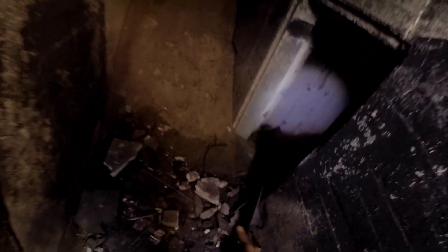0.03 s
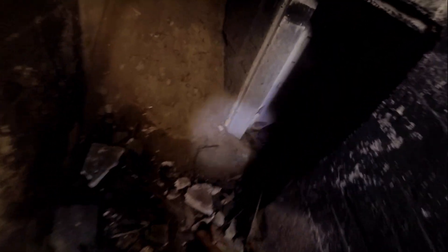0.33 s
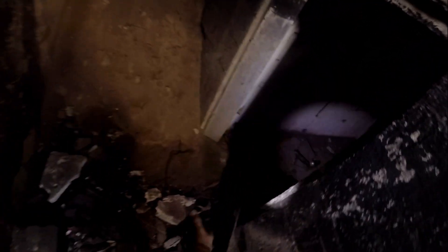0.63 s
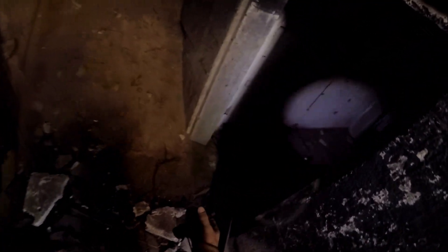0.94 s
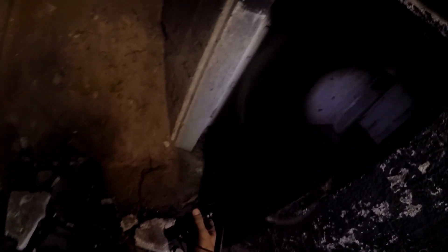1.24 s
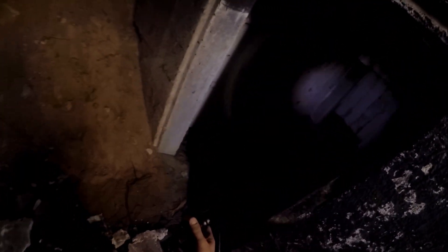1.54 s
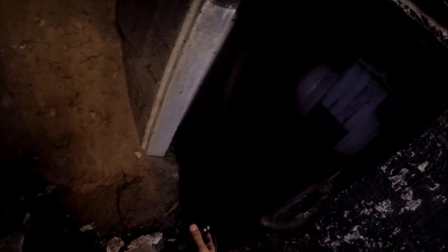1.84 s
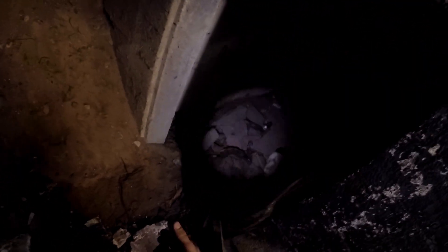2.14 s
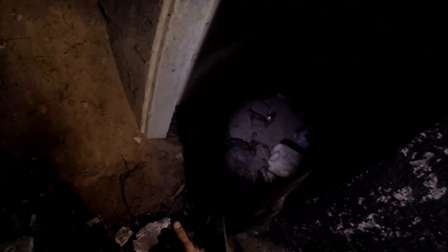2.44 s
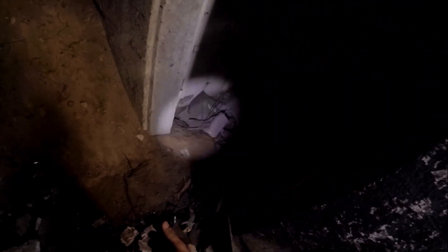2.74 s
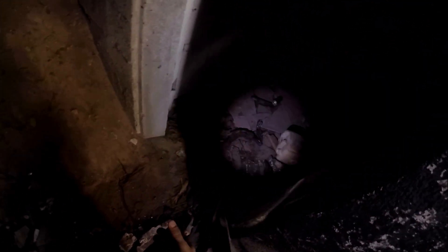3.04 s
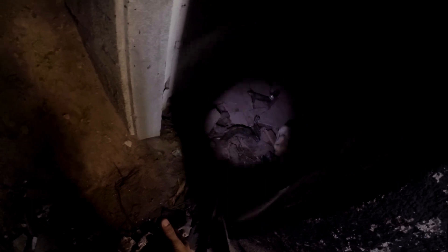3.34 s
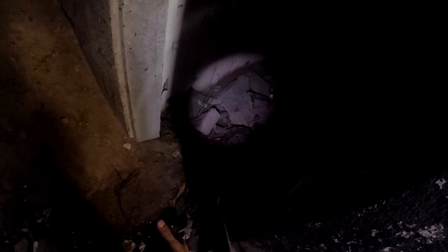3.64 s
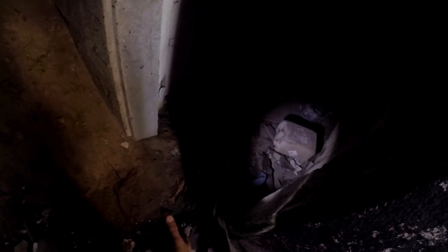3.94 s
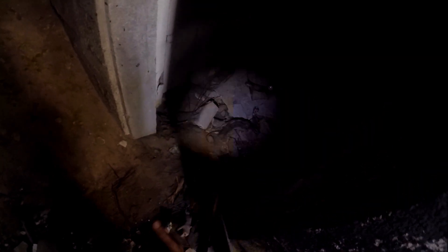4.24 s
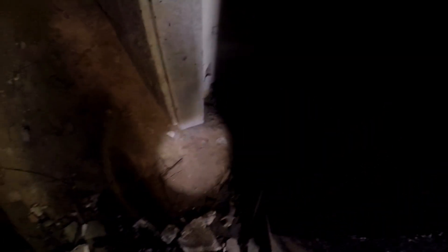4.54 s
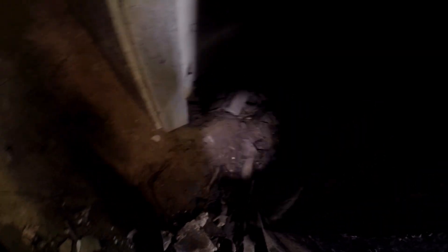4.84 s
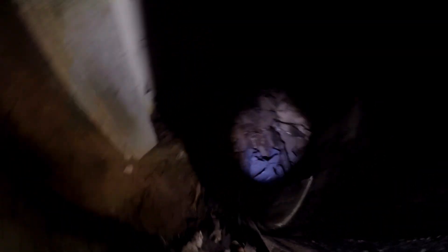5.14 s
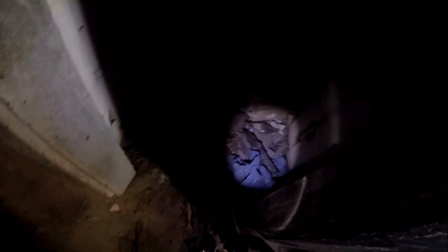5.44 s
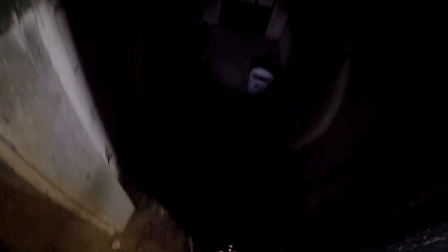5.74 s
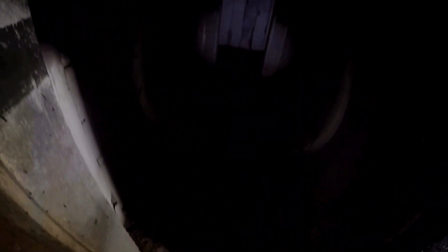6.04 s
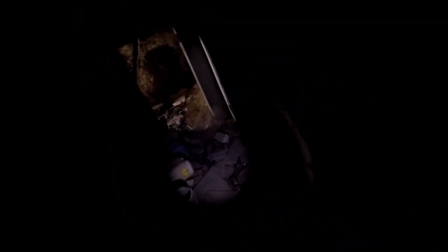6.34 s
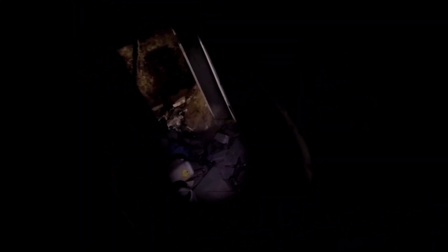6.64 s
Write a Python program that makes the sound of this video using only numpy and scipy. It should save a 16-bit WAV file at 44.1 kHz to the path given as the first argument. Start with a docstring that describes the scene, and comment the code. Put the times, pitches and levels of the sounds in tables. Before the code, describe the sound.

Close footsteps thud and grind on broken concrete over a low rumble and faint hiss. Early on, a slab tips with a sharp crack, followed by a small clink and scattered ticks of shifting pieces. A few heavier steps then scuff and crunch through the debris before it settles under a brief low throb. The hand-held stereo microphone picks up a short echo from the bare walls of an abandoned building.

```python
"""Doorway of a derelict building, hand-held stereo microphone, close to someone crossing concrete rubble.
From the start, grit trickles over low rumble and faint hiss; steps thud, grind and knock fragments
together, and bare walls add a short ring. At 1.3 s a slab cracks down hard; at 2.1 s a thin chip clinks.
Lighter knocks follow, small pieces tipping at random, until heavier steps land from 4.3 s.
After 6 s the grit settles and a deep throb swells up."""
import sys
import numpy as np
from scipy import signal
from scipy.fft import rfft, irfft, next_fast_len
from scipy.io import wavfile
from scipy.ndimage import uniform_filter1d

SR = 44100
rng = np.random.default_rng(int(sys.argv[2]) if len(sys.argv) > 2 else 0)


def to_wav(sig):
    """Store sig (one row per channel, or 1-D mono) as 16-bit WAV at the path in sys.argv[1].

    Samples outside -1..1 are clipped; the rate is SR.
    """
    pcm = np.clip(np.atleast_2d(sig), -1, 1) * 32767
    pcm = np.round(pcm).astype(np.int16)
    wavfile.write(sys.argv[1], SR, pcm.T)  # frames by channels


N = 298733
TIME = np.arange(N) / SR


def undb(db):
    """Decibels to gain."""
    return 10 ** (np.asarray(db) / 20)


def rms(x):
    """Root mean square."""
    return np.sqrt(np.mean(x ** 2))


def unit(x):
    """Scale to rms 1."""
    return x / rms(x)


def curve(rows):
    """Gain over time from rows of t/s, level/dB."""
    return undb(np.interp(TIME, *np.transpose(rows)))


def colour(x, points):
    """Causal filter through points of f/Hz, level/dB."""
    size = 2 * next_fast_len(len(x))
    hz, db = np.transpose(points)
    log_hz = np.log(np.fft.rfftfreq(size, 1 / SR) + 1)
    log_gain = np.log(undb(np.interp(log_hz, np.log(hz), db)))
    cepstrum = irfft(log_gain)[:size // 2]
    cepstrum[1:] *= 2  # minimum phase
    return irfft(rfft(x, size) * np.exp(rfft(cepstrum, size)))[:len(x)]


def band(x, lo_hz, hi_hz):
    """Band-pass."""
    return signal.sosfilt(signal.butter(3, [lo_hz, hi_hz], btype="band", fs=SR, output="sos"), x)


def resonate(x, hz, q):
    """One resonance, gain 1 at its centre."""
    return signal.lfilter(*signal.iirpeak(min(hz, SR / 3), q, fs=SR), x)


def ring(modes, t):
    """The free ringing of a struck piece: decaying sines."""
    return sum(undb(db) * np.sin(2 * np.pi * hz * t + rng.uniform(0, 2 * np.pi))
               * np.exp(-np.log(1000) * t / t60) for hz, db, t60 in modes)


def grains(count, per_s, dust, spread_db=1.8):
    """Random clicks of unequal size over a bed of fine dust."""
    clicks = (rng.random(count) < per_s / SR) * rng.standard_normal(count)
    size = undb(spread_db * np.minimum(rng.exponential(size=count), 4))
    return unit(unit(clicks * size) + dust * rng.standard_normal(count))


def add(out, s, x):
    """Mix x in at time s."""
    start = int(s * SR)
    x, start = x[max(-start, 0):], max(start, 0)
    out[start:start + len(x)] += x[:N - start]


# Rumble at the microphone: t/s, relative level/dB
RUMBLE_LEVELS = [(0.0, -37.5), (0.28, -36.5), (0.9, -44), (1.4, -39), (2.15, -47), (2.8, -44.5), (4.2, -43),
                 (5.6, -42.5), (6.2, -45), (6.77, -46.5)]
# Spectra of the rumble and of the microphone's hiss: f/Hz, relative level/dB
RUMBLE_SPECTRUM = [(4, -6.5), (15, 5), (26, -8.5), (39, -14.5), (56, -9.5), (80, -19.5), (120, -25.5),
                   (200, -41), (500, -44), (2000, -69)]
HISS_SPECTRUM = [(60, -0.5), (250, -1.5), (600, -7), (1600, -12), (4000, -13.5), (15000, -15.5)]


def rumble_and_hiss(rumble_db=1, side_db=-10, hiss_db=-57.5):
    """At the microphone: low rumble, mostly shared by both ports, and each port's own hiss."""
    mid, side = (unit(colour(rng.standard_normal(N), RUMBLE_SPECTRUM)) for _ in range(2))
    rumble = (mid + undb(side_db) * np.array([side, -side])) * curve(RUMBLE_LEVELS)
    hiss = np.array([unit(colour(rng.standard_normal(N), HISS_SPECTRUM)) for _ in range(2)])
    return rumble * undb(rumble_db) + hiss * undb(hiss_db)


# The closing swell in the bass: t/s, level/dB
THROB_LEVELS = [(6.1, -68), (6.35, -45.5), (6.5, -38), (6.66, -36), (6.72, -39), (6.77, -43)]


def throb(hz=31.8, upper_hz=57.0, upper_db=-11, waver=0.0566):
    """A deep, slightly wavering throb of two tones."""
    drift = unit(uniform_filter1d(rng.standard_normal(N), SR // 10))
    turn = 2 * np.pi * np.cumsum(1 + waver * drift) / SR
    return unit(np.sin(hz * turn) + undb(upper_db) * np.sin(upper_hz * turn)) * curve(THROB_LEVELS)


# Stereo width at the microphone: f/Hz, side against mid/dB
STEREO_WIDTH = [(50, -19), (200, -22), (700, -22), (1300, -56), (2400, -33), (4400, -13), (8000, -6),
                (15000, 1)]


def stereo_pair(x, scatter_s=0.0013, shifts_per_s=4.3):
    """Two close ports share the bass; the treble scatters differently to each as the source shifts."""
    t = np.arange(SR // 20) / SR
    paths = [unit(rng.standard_normal(len(t)) * np.exp(-t / scatter_s)) for _ in range(2)]
    one, other = (signal.fftconvolve(x, path / np.sqrt(len(t)))[:N] for path in paths)
    angle = 2 * np.pi * shifts_per_s * TIME
    side = colour(one * np.cos(angle) + other * np.sin(angle), STEREO_WIDTH)
    return np.array([x + side, x - side])


# Body, clack, bite and air bands of walls and rubble: lower f/Hz, upper f/Hz
BAND_EDGES = [(150, 700), (700, 2500), (2500, 7000), (7000, 15000)]


def walls(x, early_db=-8, early_s=0.015, late_db=-17, t60_low=0.34, t60_high=0.4):
    """Close reflections from ground and door frame, then the ring of the building farther off."""
    t = np.arange(SR) / SR
    early = rng.standard_normal(len(t)) * np.exp(-t / early_s) * (t > .003)
    t60s = np.linspace(t60_low, t60_high, len(BAND_EDGES))
    late = sum(band(rng.standard_normal(len(t)), *edges) * np.exp(-np.log(1000) * t / t60)
               for edges, t60 in zip(BAND_EDGES, t60s)) * (t > .012)
    response = (undb(early_db) * unit(early) + undb(late_db) * unit(late)) / np.sqrt(len(t))
    return x + signal.fftconvolve(x, response)[:N]


# Spectrum of the grit on the ground: f/Hz, relative level/dB
GRIT_SPECTRUM = [(60, -7), (250, 7), (600, 1), (1400, 0), (3000, -5), (7000, -9), (9000, -10),
                 (11000, -16.5), (15000, -28.5)]
# Grit settling under the shifting weight: t/s, relative level/dB
GRIT_LEVELS = [(0.0, -53.5), (0.3, -59), (0.49, -51.5), (0.78, -58.5), (0.94, -58), (1.24, -59),
               (1.38, -47), (1.7, -59), (2.62, -56.5), (3.0, -63.5), (3.55, -66), (4.15, -61),
               (4.49, -52.5), (4.95, -54.5), (5.12, -47.5), (5.62, -48.5), (6.05, -67.5), (6.77, -76)]


def grit(dust_db=-3, crumb_db=-7, crumb_q=7):
    """Around the feet fine dust trickles and tiny crumbs rustle, each at its own pitch."""
    dust = grains(N, per_s=900, dust=1, spread_db=0.43)
    crumbs = sum(resonate(grains(N, per_s=50, dust=0, spread_db=1.2), hz, crumb_q)
                 for hz in np.geomspace(700, 9000, num=12))
    dust, crumbs = (unit(colour(x, GRIT_SPECTRUM)) for x in (dust, crumbs))
    return (undb(dust_db) * dust + undb(crumb_db) * crumbs) * curve(GRIT_LEVELS)


def tipping_pieces(count=24, over_grit_db=1, spread_db=3, lo_hz=900, hi_hz=5500):
    """Small fragments tip over at random, as strongly as the grit is stirred."""
    out, stirred = np.zeros(N), np.transpose(GRIT_LEVELS)
    for k, (when, strength, pitch) in enumerate(rng.random((count, 3))):
        s = (k + when) / count * TIME[-1]
        db = np.interp(s, *stirred) + over_grit_db + spread_db * (2 * strength - 1)
        hz = lo_hz * (hi_hz / lo_hz) ** pitch
        add(out, s, knock(db, bite_db=1, air_db=-6, hz=hz, ring_db=9))
    return out


# Weight landing below the microphone: t/s, level/dB, f/Hz, decay/s
FOOTFALLS = [(0.278, -34.5, 291, 0.024), (1.24, -34.5, 67, 0.035), (1.383, -42, 54.6, 0.031),
             (2.05, -40.5, 328, 0.0028), (2.074, -51, 87.6, 0.055), (4.351, -30, 62.3, 0.024),
             (4.405, -36, 64.6, 0.065), (5.003, -39, 118, 0.11), (5.115, -34, 88, 0.082),
             (5.139, -36.5, 255, 0.059)]


def thuds(attack_s=0.0024, q=1.93):
    """The heel's soft push booms briefly in the ground."""
    out, t = np.zeros(N), np.arange(SR // 2) / SR
    for s, db, hz, decay in FOOTFALLS:
        envelope = (1 - np.exp(-t / attack_s)) * np.exp(-t / decay)
        boom = resonate(resonate(rng.standard_normal(len(t)), hz, q), hz, q) * envelope
        add(out, s, undb(db) * unit(boom) * rms(envelope / envelope.max()))
    return out


# Spectrum of broken concrete at close range: f/Hz, relative level/dB
CONCRETE_SPECTRUM = [(100, -6), (260, 8), (800, 4.5), (1500, 1.5), (3000, -3.5), (6000, -5.5), (8500, -7.5),
                     (10500, -11), (15000, -17.5)]


def concrete(push, envelope, band_db):
    """Concrete's answer to a push: body, clack, bite and air each take their share of the energy."""
    x = colour(push, CONCRETE_SPECTRUM)
    return sum(undb(db) * unit(band(x, *edges)) for edges, db in zip(BAND_EDGES, band_db)) * rms(envelope)


# The sole grinding on grit, body and bite against the clack:
# peak t/s, fall/s, clack level/dB, body/dB, bite/dB, ring f/Hz
SOLE_SCUFFS = [(.312, 0.032, -52.5, 2, 0.5, 356), (0.389, 0.032, -43.5, -2.5, -1.5, 990),
               (.487, 0.019, -49, 6, -10, 335), (.563, 0.014, -47.5, 5, -10, 264),
               (1.229, 0.012, -35.5, -1.5, -2.5, 599), (1.248, 0.012, -26, -5, -1, 1290),
               (1.273, 0.006, -34, -1, 5, 564), (1.296, 0.018, -36.5, -1, -5, 400),
               (1.438, 0.013, -41, -17, -1, 1820), (1.5, 0.0096, -43.5, -12, -0.5, 1640),
               (1.546, 0.025, -46.5, -5, 1.5, 1520), (1.63, 0.089, -55.5, 3, -12, 1240),
               (1.93, 0.022, -62.5, -1, 6, 3000), (2.081, 0.028, -46.5, 4.5, 2, 250),
               (2.12, 0.011, -45, -15, 2.5, 1320), (2.265, 0.011, -54.5, 8, 1, 450),
               (2.466, 0.0075, -55.5, -15, 9, 9000), (2.629, 0.018, -52, -21, 1.5, 4800),
               (2.87, 0.076, -56.5, -3.5, 3.5, 8450), (2.964, 0.023, -50.5, -2, 9.5, 1970),
               (4.315, 0.033, -50.5, -5, 2.5, 1850), (4.364, 0.019, -43.5, 1, -2, 335),
               (4.455, 0.022, -54, -4, -4, 1600), (4.969, .012, -40.5, -2, 3.5, 2650),
               (4.984, 0.0094, -35, -8.5, -4, 1710), (5.035, 0.068, -43.5, -3.5, -1.5, 4900),
               (5.113, 0.0082, -25, -6, -1, 2220), (5.129, 0.012, -26.5, -7, -7, 666),
               (5.158, 0.035, -25.5, -6.5, -6.5, 806), (5.195, 0.023, -37, -1.5, 2, 565),
               (5.3, 0.052, -43, -10, -8, 1350), (5.487, 0.053, -43, -6, -7, 1310),
               (5.66, 0.033, -40, -6, -4.5, 783), (5.788, 0.02, -54.5, 10.5, 2, 850),
               (5.965, 0.021, -49.5, -1.5, 4.5, 2450)]


def scuffs(air_db=-11, patchy_db=2.5, rise_share=0.93, ring_db=8, ring_q=10, damped_below_hz=650):
    """Grit crushes harder as the foot bears down, then dies away; the piece underfoot colours it."""
    out, t = np.zeros(N), np.arange(-SR // 5, SR // 3) / SR
    for s, fall, db, body_db, bite_db, hz in SOLE_SCUFFS:
        age = t / fall
        envelope = np.exp(-np.where(age < 0, (age / rise_share) ** 2, age))
        # the grit gives way in fits and starts
        fits = unit(uniform_filter1d(rng.standard_normal(len(t)), SR // 300))
        push = unit(grains(len(t), per_s=3000, dust=0.79) * undb(patchy_db * fits)) * envelope
        q = ring_q * min(hz / damped_below_hz, 1)  # low-pitched pieces lie deep and are damped more
        push = push + undb(ring_db) * resonate(push, hz, q)
        band_db = db + np.array([body_db, 0, bite_db, bite_db + air_db])
        add(out, s + t[0], concrete(push, envelope, band_db))
    return out * 1.0


# A thin chip clinking underfoot: t/s, level/dB
CHIP_CLINKS = [(2.077, -31), (2.113, -42), (2.123, -36.5)]
# Its modes: f/Hz, relative level/dB, t60/s
CHIP_RESONANCES = [(4120, -4.5, 0.047), (4850, 1, 0.039), (5660, -13, 0.045), (6220, 0, 0.035),
                   (7150, -12, 0.035), (7740, -3, 0.035)]


def chip():
    """A thin, hard chip rings higher and cleaner than the lumps around it."""
    out, t = np.zeros(N), np.arange(SR // 5) / SR
    for s, db in CHIP_CLINKS:
        add(out, s, undb(db) * ring(CHIP_RESONANCES, t))
    return out


def knock(db, bite_db, air_db, hz, ring_db, body_db=-10, snap_db=-16, rise_s=.0005, decay_s=.0042):
    """A sharp contact and a brief chatter ring a fragment's main mode and a few weaker ones."""
    t = np.arange(SR // 10) / SR
    envelope = (1 - np.exp(-t / rise_s)) * np.exp(-t / decay_s)
    push = grains(len(t), per_s=5000, dust=0.52) * envelope
    push[int(rise_s * SR)] += 4.4  # rough faces crush for an instant, then bear fully with a tick
    weak_hz = np.geomspace(500, 7000, num=9) * rng.uniform(0.79, 1.28, size=9)
    weak_modes = sum(resonate(push, f, q=18) for f in weak_hz)
    push = push + undb(ring_db) * resonate(push, hz, q=5) + weak_modes
    clack = concrete(push, envelope, db + np.array([body_db, 0, bite_db, air_db]))
    # snapping crumbs reach the very top of the treble
    snap = unit(band(rng.standard_normal(len(t)), 11200, 20000)) * envelope
    return clack + snap * undb(db + air_db + snap_db)


# Fragments knocking close by, bite and air against the clack:
# t/s, relative clack level/dB, bite/dB, air/dB, ring f/Hz, ring gain/dB
FRAGMENT_KNOCKS = [(0.021, -37.5, -21, -32, 1600, 15), (0.281, -42, -11, -7.5, 795, 15),
                   (0.39, -42, 4, -3, 1220, 8), (0.565, -51.5, 6.5, -1, 624, -1),
                   (0.912, -33.5, -18.5, -21, 1080, 31), (0.969, -34, -8, -30, 780, 4.6),
                   (1.19, -43, -3, -13, 1000, 12), (1.244, -22, 2.5, -25, 2180, 17),
                   (1.269, -28, 10.5, 0, 3800, 8.9), (1.413, -47, 3, 2, 3110, 7),
                   (1.533, -38, -17, -3.5, 1580, 19), (1.614, -44, -0.5, -15, 600, 10),
                   (1.626, -54.5, 11, 8, 870, 20), (1.905, -53.5, 8, 3, 3040, 4),
                   (1.986, -64, 14, 22.5, 7900, 2.3333), (2.074, -38, 7.5, 9.5, 6300, 19),
                   (2.26, -45.5, -9, -3, 930, 8), (2.312, -37, -2.5, -9, 990, 4.8),
                   (2.458, -57.5, 9, 18, 9100, 4), (2.621, -35.5, -7, -29, 2280, 9.8),
                   (2.879, -42.5, 6, 8.5, 5600, 24), (2.942, -49, 18, 8, 3880, 15),
                   (2.962, -40.5, 8, -3, 4560, 13), (3.076, -34.5, -5.5, -8.5, 1950, 11),
                   (3.216, -53.5, 2.5, 0, 1700, 8), (3.692, -45.5, 11, 2.5, 4430, 5),
                   (4.052, -54.5, 2, 6.5, 5620, 18), (4.13, -46.5, -21, -13, 1040, 24),
                   (4.25, -49, 6, 2, 6520, 2.6667), (4.28, -41.5, 4.5, 4.5, 659, 13),
                   (4.35, -31.5, -6, -20, 1500, 2.3), (4.387, -47.5, 6, 5.5, 3490, 9),
                   (4.411, -42.5, 2.5, -9, 3160, 10), (4.531, -53.5, 7.5, -8, 2470, 3),
                   (4.686, -45, -2, -22, 2070, 22), (4.924, -51, 11, 2.5, 5740, 6.4),
                   (4.964, -28.5, -3.5, -9.5, 1650, 10), (5.017, -36.5, 6.5, -10, 4840, 13),
                   (5.108, -29.5, 10.5, -18, 2080, 2.6667), (5.371, -38, -8, -13, 1270, 3),
                   (5.47, -49, -3, 2, 1230, 10), (5.645, -32.5, -0.5, -8, 760, 21),
                   (5.668, -42, -12, -19, 800, 19), (5.774, -35, -12, -30, 990, 18)]


def knocks(gain_db=2):
    """The larger fragments clack together under the feet."""
    out = np.zeros(N)
    for s, *fragment in FRAGMENT_KNOCKS:
        add(out, s, knock(*fragment))
    return out * undb(gain_db)


# The slab coming down near the microphone: t/s, crack level/dB, ring level/dB
SLAB_IMPACTS = [(1.2878, -11.5, -35), (1.2894, -10, -27.5), (1.2925, -22.5, -45)]
# Its modes: f/Hz, relative level/dB, t60/s
SLAB_RESONANCES = [(820, -2, 0.1), (1360, 7, 0.039), (1556, 4.5, 0.045), (2120, 2.5, .04), (2370, -12, .03),
                   (2760, 6, 0.024), (3330, -5, 0.018), (3616, 11, .022), (3780, 12, 0.022),
                   (4500, -12, 0.012), (5540, 10, 0.02), (5620, -13, .016), (6150, 11.5, 0.022),
                   (8240, 7, .025)]


def slab(lo_hz=1200, hi_hz=7000, decay_s=.0013):
    """A slab slaps down and rocks: hard cracks and their short stony modes."""
    out, t = np.zeros(N), np.arange(SR // 5) / SR
    envelope = np.exp(-t / decay_s)
    for s, crack_db, ring_db in SLAB_IMPACTS:
        crack = unit(band(rng.standard_normal(len(t)) * envelope, lo_hz, hi_hz)) * rms(envelope)
        add(out, s, undb(ring_db) * ring(SLAB_RESONANCES, t) + undb(crack_db) * crack)
    return out


def scene():
    """Footsteps on rubble between bare walls, heard from the walker's hand."""
    rubble = knocks() + tipping_pieces() + scuffs() + slab() + chip() + grit()
    return stereo_pair(walls(rubble) + thuds() + throb()) + rumble_and_hiss()


def record(dry):
    """The hand-held camera cuts the treble above 15.5 kHz."""
    return signal.sosfilt(signal.ellip(8, .2, 70, 15500, fs=SR, output="sos"), dry)


dry = scene()
out = record(dry)
to_wav(out)
```